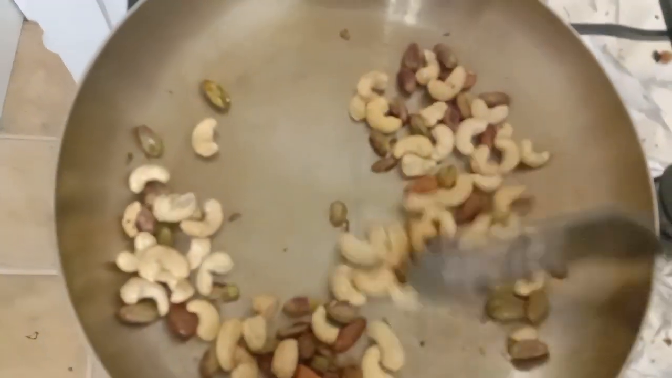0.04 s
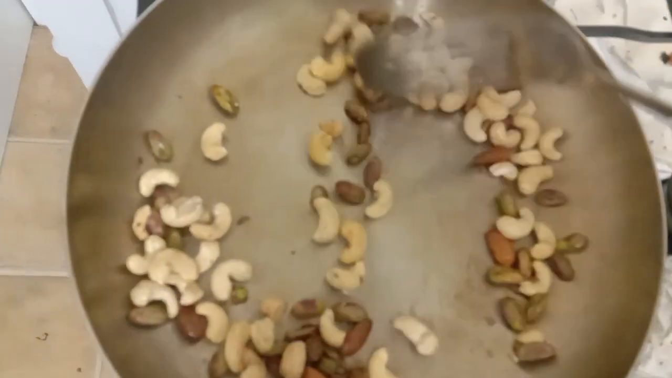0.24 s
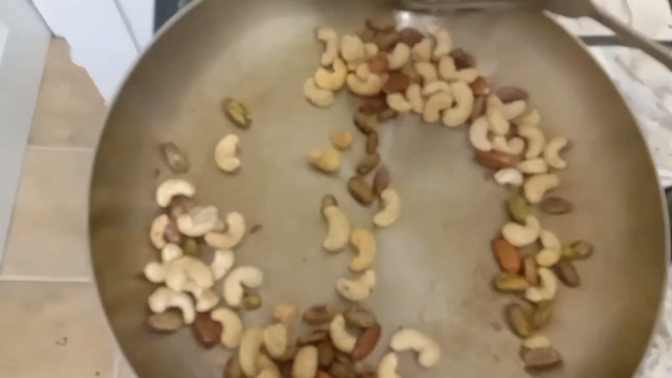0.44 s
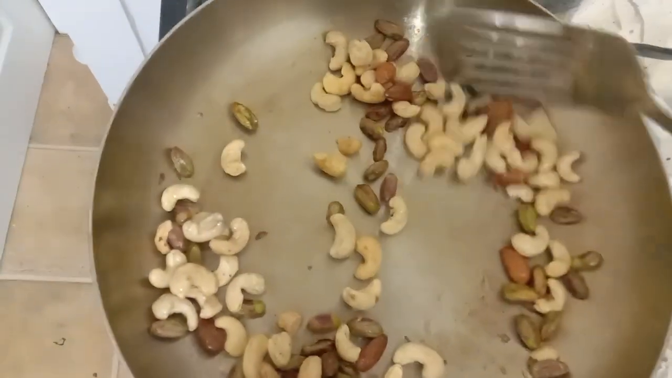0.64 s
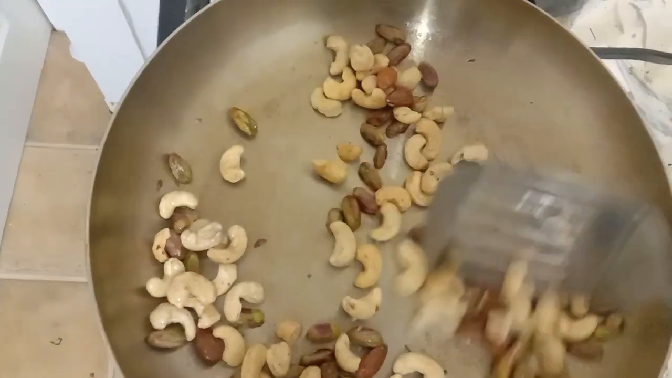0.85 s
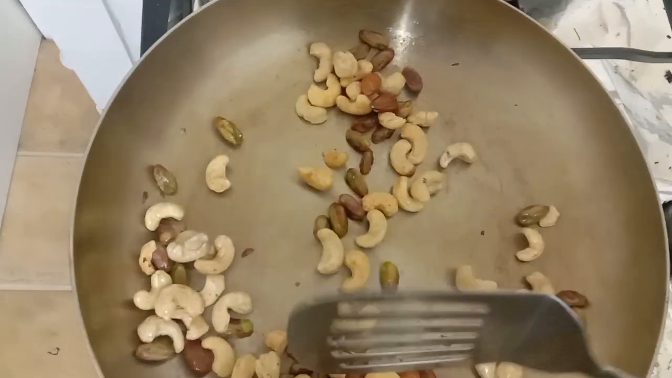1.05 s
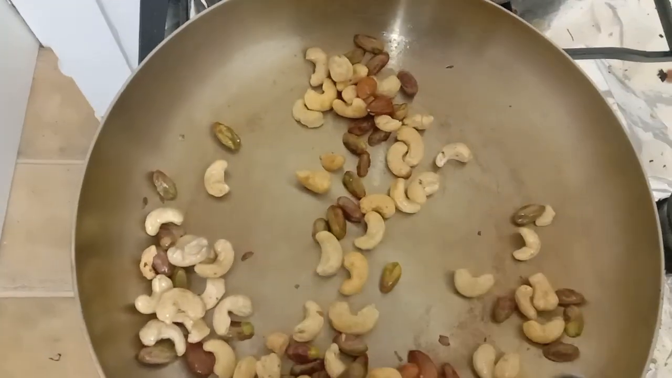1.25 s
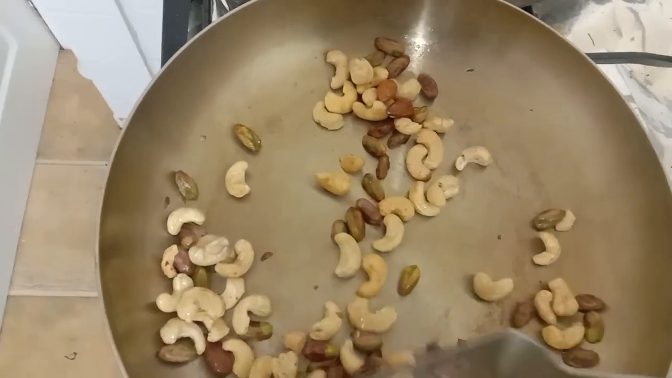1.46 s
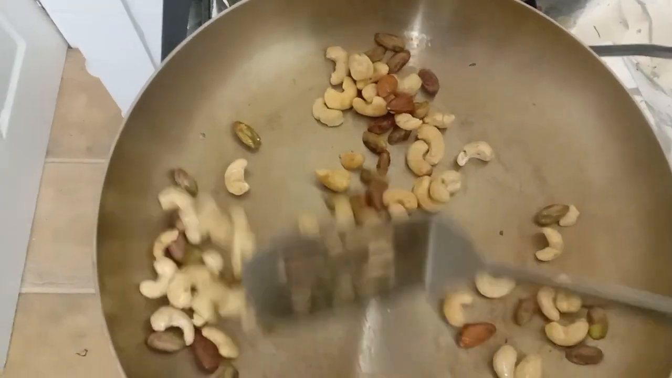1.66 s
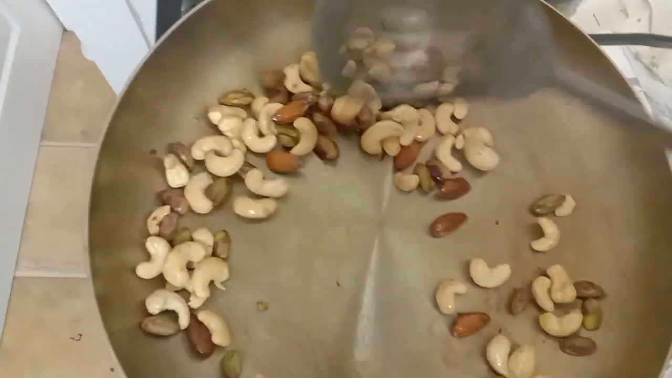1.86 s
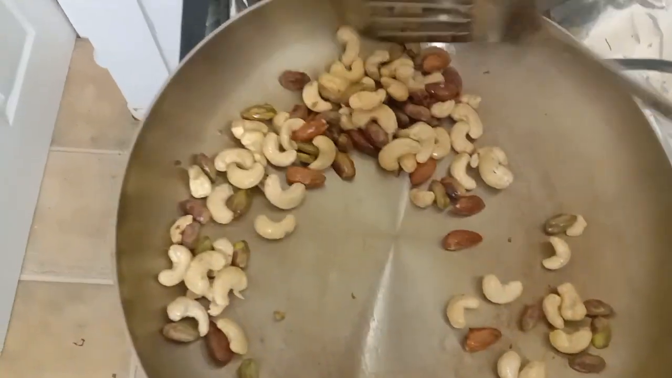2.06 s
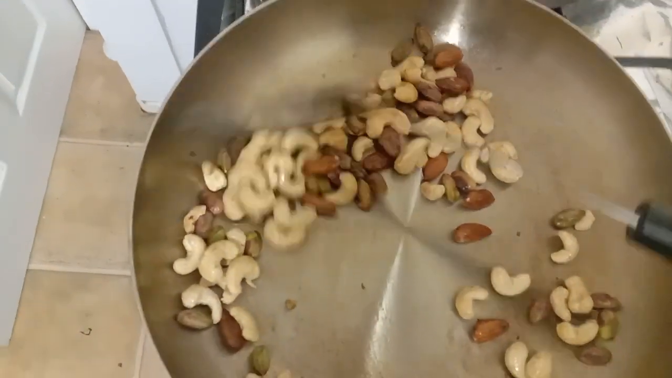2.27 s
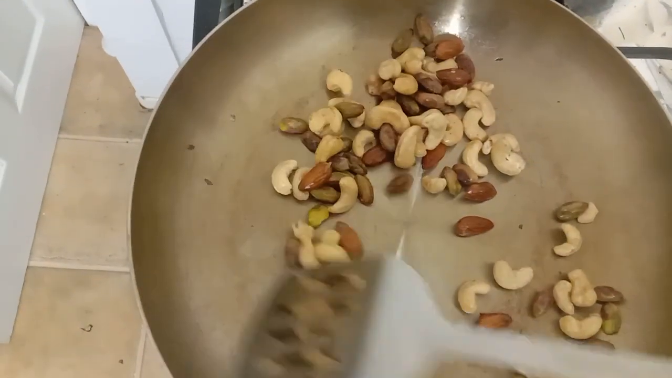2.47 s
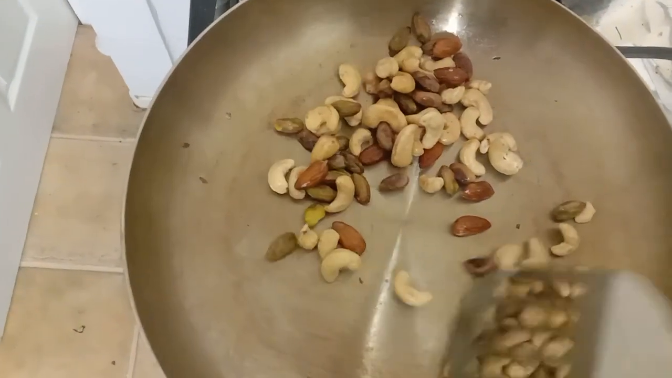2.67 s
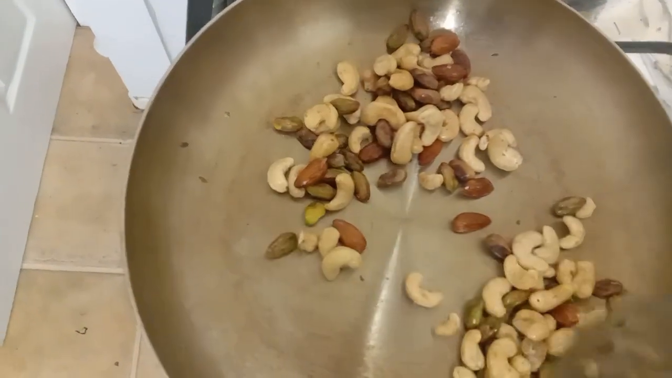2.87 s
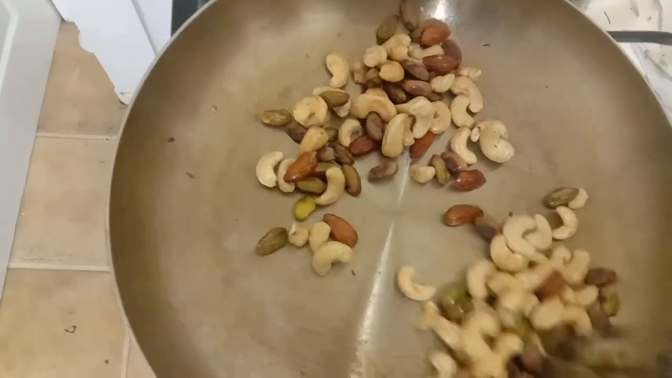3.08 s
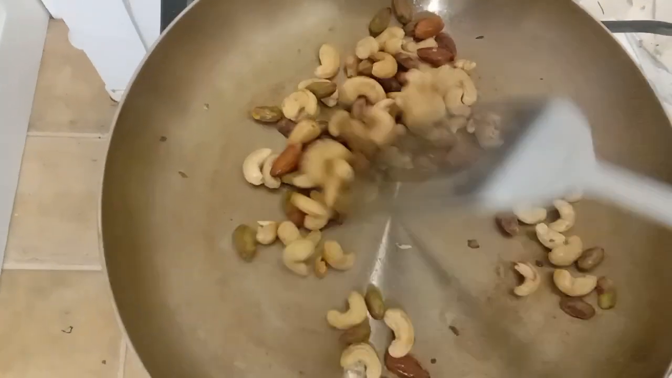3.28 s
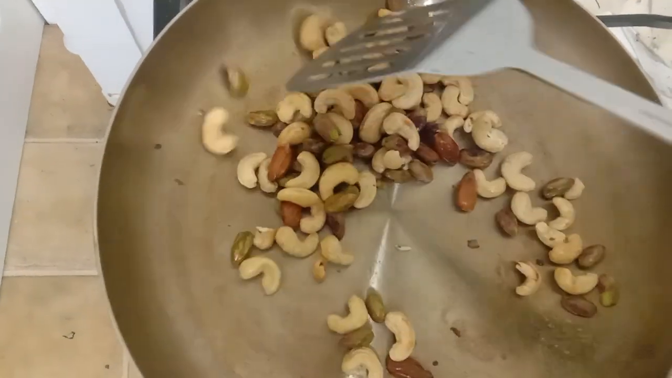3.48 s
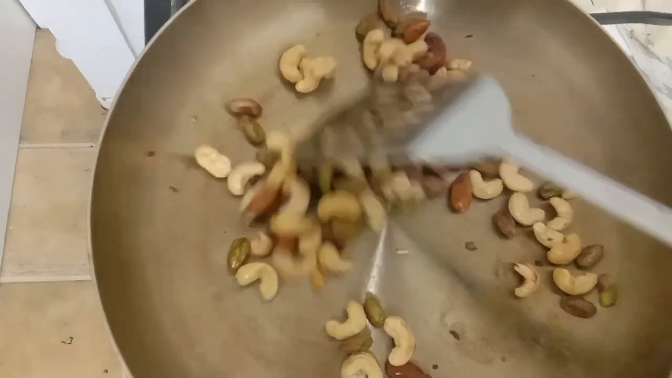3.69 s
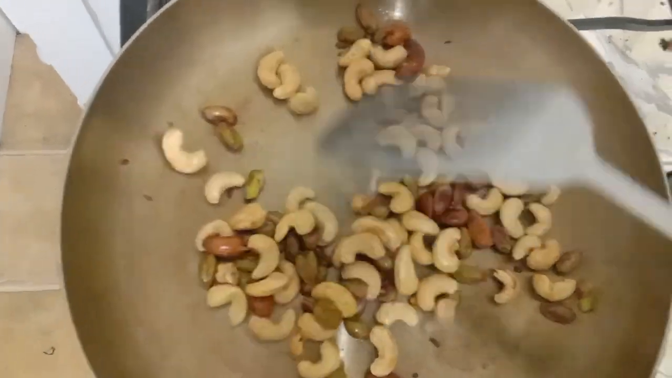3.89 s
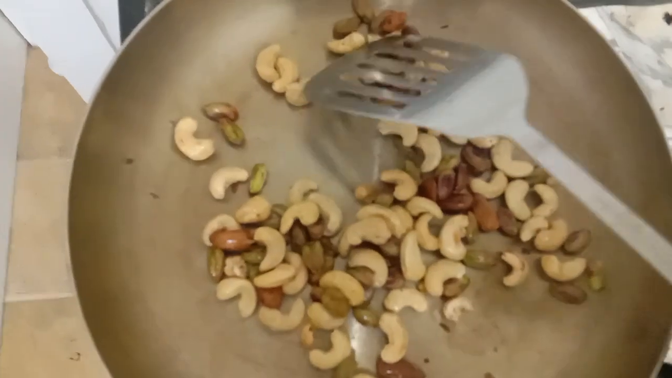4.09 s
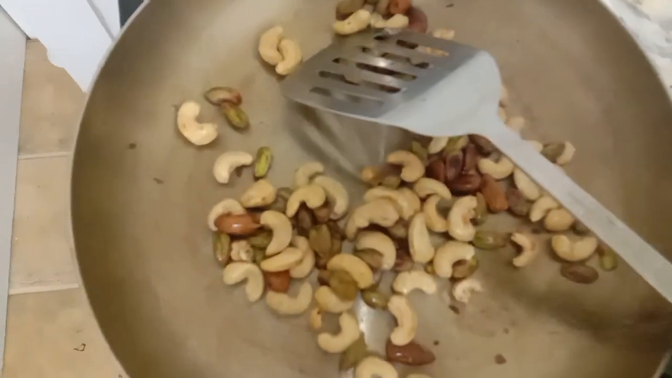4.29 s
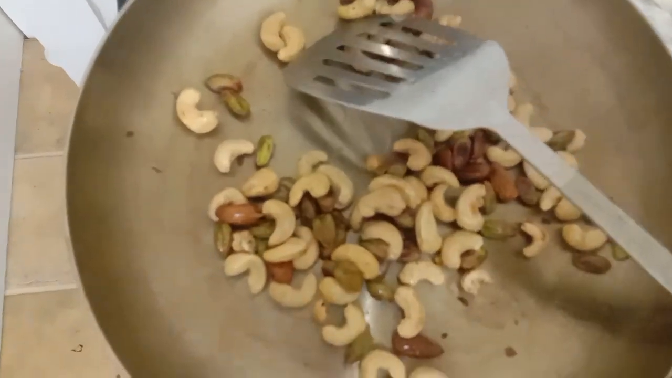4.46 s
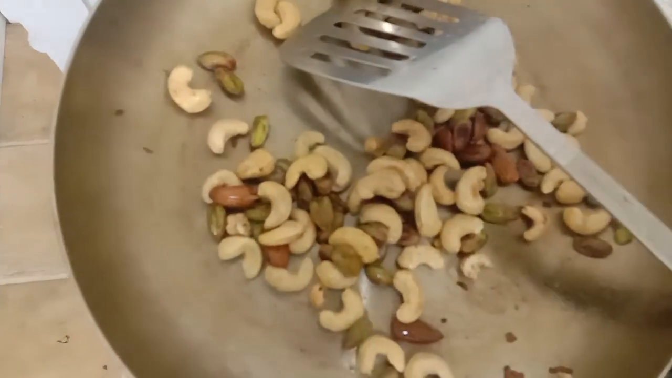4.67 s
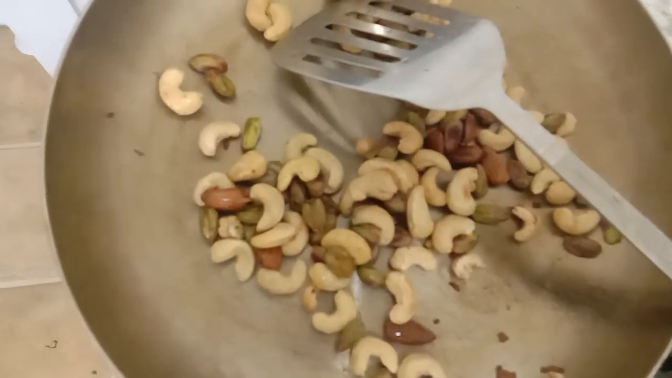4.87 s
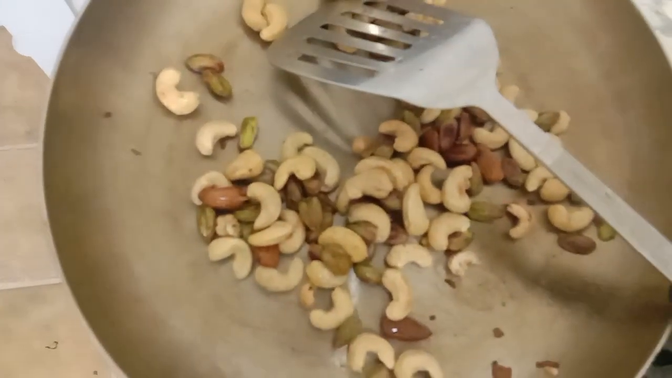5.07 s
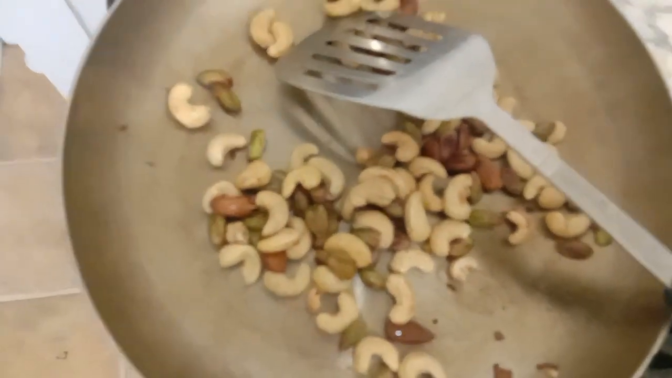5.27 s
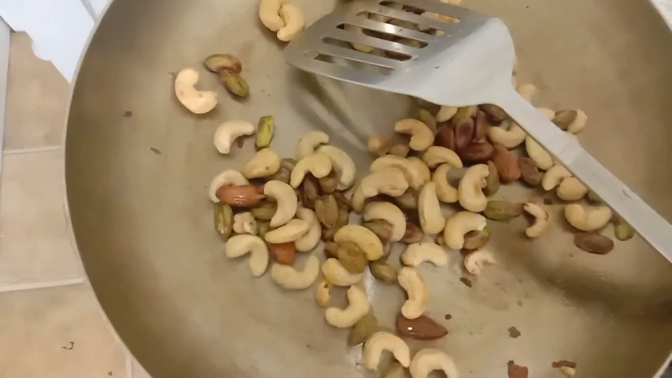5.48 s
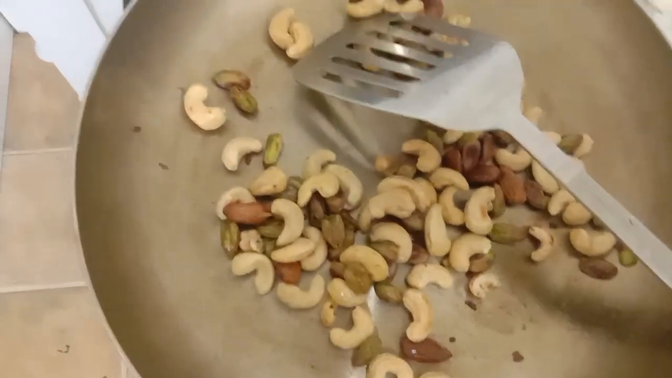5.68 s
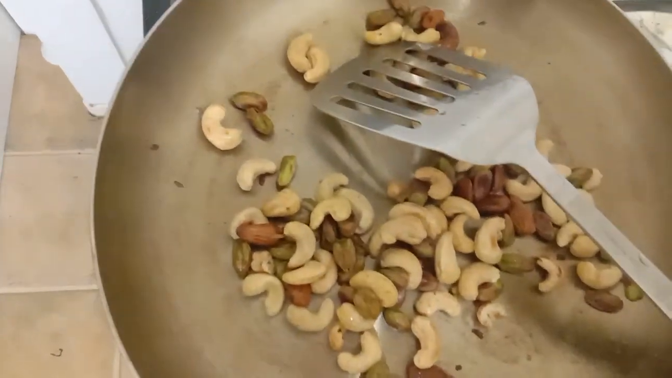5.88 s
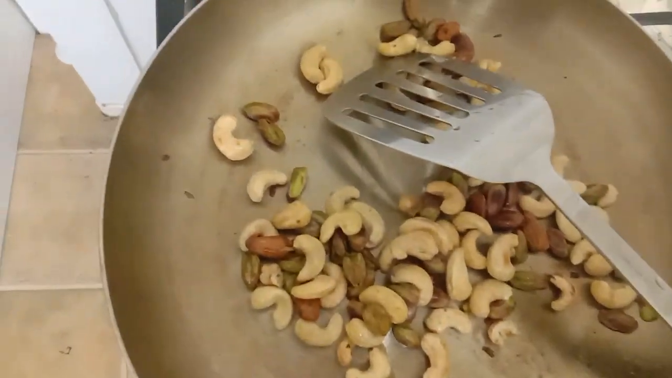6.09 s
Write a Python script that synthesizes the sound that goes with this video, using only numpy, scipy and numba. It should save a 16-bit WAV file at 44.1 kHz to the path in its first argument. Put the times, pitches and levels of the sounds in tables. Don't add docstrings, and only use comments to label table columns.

```python
import sys
import numpy as np
from scipy import signal
from scipy.fft import rfft, irfft, next_fast_len
from scipy.io import wavfile
from scipy.ndimage import uniform_filter1d
from numba import njit

SR = 44100
rng = np.random.default_rng(int(sys.argv[2]) if len(sys.argv) > 2 else 0)


def file_out(sig):
    cols = np.atleast_2d(sig).T
    lim = np.clip(cols, -1, 1)
    pcm = np.round(lim * 32767).astype(np.int16)
    wavfile.write(sys.argv[1], SR, pcm)


def linear_from_db(decibels):
    return 10 ** (np.asarray(decibels, float) / 20)


N = 270774

PAN_HZ = [205, 237, 340, 530, 813, 861, 947, 1197, 1250, 1292, 1540, 1600, 1763, 1873, 2330, 2520, 2595,
          2937, 3020, 3420, 3600, 4223]
PAN_DB = [-13.5, -8.5, -2.5, -3.5, -21, -2.5, -2, -6.5, -3.5, -8, -20.5, -7, -18, -14, -13.5, -5.5, -17,
          -14, -6.5, -1, -4, -8]
BLADE_HZ = [4650, 4760, 4833, 4955, 5245, 5590, 5645, 5750, 5800, 5896, 6435, 6540, 6854, 7050, 7240, 8750,
            9030, 9770, 10650, 11000, 12000, 12900, 14400, 14950, 15200]
BLADE_DB = [-7.5, -5.5, -12.5, -4.5, -5.5, -1.5, -3.5, -10, -5.5, -5.5, -2.5, -6.5, 0.5, -2, -5.5, -6.5,
            -11, 1, -5.5, 2, 4, -6, 2, 2.5, -2.5]
MAIN_HZ = [205, 237, 530, 1197, 1292, 5645, 5750]
# f/Hz, t60/s
DECAY = [(100, 0.42), (500, 0.11), (1500, 0.6), (5000, 0.33), (15000, 0.12)]
ZONES_HZ = [350, 1700, 5700, 11000]
OCTAVES_HZ = 60 * 2 ** np.arange(9)

# t/s, peak level/dB, clink level/dB, edge level/dB, f of the spot struck/Hz
BLOWS = [(0.0, -15, -12.5, -19, 1300), (0.079, -28, -0.5, -39.5, 3000), (0.164, 6, -13.5, -20, 3000),
         (0.604, -9, -6, -2, 6850), (0.799, -16, -18.5, -20.5, 2480), (0.822, -8.5, -13, -51, 2110),
         (1.318, -42, -18, -69, 3820), (1.466, -7.5, -13, -17, 3350), (2.175, -24.5, 2, 6, 1290),
         (2.384, -27, -21, -26, 529), (2.474, -4.5, -13.5, -11.5, 2554), (2.483, -7, -6.5, -10, 1287),
         (2.501, -7, -17, -33.5, 2390), (3.087, -16, -3.5, -4.5, 2600), (3.205, -8, 1, -10, 4600),
         (3.225, -19, -1, -30, 205), (4.51, -25, -29, -51, 330), (6.09, -66.5, -24, 23, 6000),
         (6.099, -68, -6.5, 23, 3000)]
BLOW_THUD_DB, SPOT_DB, SPOT_WIDTH = -27.5, 8, 0.05
BLOW_RING, PRESS_DB_PER_DB = 0.13, 0.78
BLOW_CONTACT_S, NUT_CONTACT_S = 0.0039, 0.0012
# t/s, peak level/dB, clink level/dB, f/Hz
NUTS = [(0.42, -40, -13.5, 980), (0.958, -28, -54, 937), (1.013, -34, -50, 930), (1.55, -21.5, -28, 1200),
        (1.73, -37, -40, 1560), (1.756, -39, -52, 870), (1.845, -26.5, -42, 1117),
        (2.037, -26.5, -77, 1223), (2.682, -30.5, -7, 947), (2.827, -32, -36, 1143), (3.401, -68, -45, 800),
        (3.432, -27, -55, 940), (3.463, -30.5, -6, 923), (3.483, -26.5, -29, 1246),
        (3.575, -26.5, -22, 1546), (3.708, -22, -17, 1318), (3.74, -29.5, -20, 780), (3.773, -27, -63, 865),
        (3.836, -22, -18, 1409), (3.859, -25, -19, 943), (3.892, -18.5, -44, 1080), (4.03, -36, -34.5, 910),
        (4.046, -29.5, -21, 860.5), (5.99, -56, -10.5, 1297)]
NUT_THUD_DB, NUT_RING = -52.5, 0.22
SHELL_HZ, SHELL_DB = 2835, 9.5
KNOCK_DB, KNOCK_S = -16.5, 0.013
# t/s, f/Hz, lift level/dB
PAN_SPOTS = [(0.079, 3010, 4), (0.079, 3540, 4), (0.164, 874, 7), (0.164, 1276, -10), (0.164, 2530, 2.5),
             (0.164, 2950, 6), (0.164, 3350, 2.5), (0.604, 240, 4), (0.604, 1300, 3.5), (0.604, 862, 3),
             (0.604, 3604, -6), (0.604, 3430, 2.5), (0.822, 1626, 6), (0.822, 2030, 0), (0.822, 2420, 4),
             (0.822, 3420, -2), (0.822, 3570, -5), (0.822, 4223, -6), (1.466, 231, 4), (1.466, 1180, -15),
             (1.466, 3356, -5), (1.466, 2000, 3.5), (1.549, 238, 5), (1.845, 558, 7.5), (1.845, 2990, 8.5),
             (2.176, 242, 9.5), (2.176, 526, 6), (2.176, 1300, -4), (2.176, 2080, 3.5), (2.384, 2300, -6),
             (2.474, 1190, -1), (2.474, 1904, 3), (2.474, 2303, 8), (2.474, 2580, 0), (2.474, 3410, 4),
             (2.474, 4250, 1), (3.088, 947, -8), (3.088, 1200, 3), (3.088, 1844, 3.5), (3.088, 2340, 4.5),
             (3.088, 2633, 6.5), (3.088, 3350, 4.5), (3.088, 4240, 9), (3.205, 203, 4), (3.205, 1204, -5),
             (3.205, 1273, -5), (3.205, 947, -5), (3.205, 3453, 6.5), (3.205, 3560, -6), (3.205, 2990, -1),
             (3.575, 2520, 8), (3.707, 2865, 4.5), (3.707, 340.4, 17), (3.836, 2520, 9), (4.511, 947, -12),
             (4.511, 1600, -19)]
# t/s, f/Hz, lift level/dB
BLADE_SPOTS = [(0.0, 5630, 4), (0.0, 5900, 2.5), (0.079, 5800, 3.5), (0.079, 4650, -6), (0.164, 5750, 4),
               (0.164, 5645, -2.5), (0.164, 6535, 3.5), (0.164, 6670, 2), (0.604, 4660, 8),
               (0.604, 5593, 0.5), (0.604, 5645, -9), (0.604, 5850, 3), (0.604, 6800, 3),
               (0.604, 7240, -11), (0.604, 7050, -7.5), (0.604, 8750, 1), (0.604, 9770, -12),
               (0.604, 7860, 6), (0.822, 4870, 6.5), (0.822, 6030, 2), (1.466, 5642, 1), (1.466, 5750, -7),
               (1.466, 4600, -14), (1.466, 6140, 12), (1.466, 6890, 7.5), (1.549, 5783, 5),
               (2.176, 4630, 7), (2.176, 5750, -1.5), (2.176, 6480, 5.5), (2.176, 8760, 5),
               (2.384, 5680, 6), (2.384, 6400, 7.5), (2.384, 8770, 7), (2.384, 9690, 4.5),
               (2.474, 4770, 0.5), (2.474, 5070, 4), (2.474, 5680, 0.5), (2.474, 6450, 4.5),
               (3.088, 4760, 6), (3.088, 5630, 0), (3.088, 6760, -6.5), (3.205, 4810, 3), (3.205, 5645, -7),
               (3.205, 5750, 2.5), (3.205, 5910, 4.5), (3.205, 6574, -1), (3.205, 6880, 1.5),
               (3.463, 5750, 14.5), (4.511, 5870, -1), (4.511, 5640, -8)]

# t/s, length/s, level/dB, change along the stroke/dB, edge level/dB
SCRAPES = [(0.0, 0.077, -21.5, -17, -16), (.084, 0.055, -23, -4, -26.5), (.175, 0.064, -25.5, -3, -17),
           (.612, 0.13, -29.5, -10, -17), (.795, 0.034, -37, 15.5, -26), (1.312, 0.026, -45, -1, -63),
           (1.38, 0.05, -48, -2, -59), (1.475, 0.073, -49, 15.5, -25), (1.57, 0.4, -49.5, -2.5, -30),
           (2.18, 0.083, -35.5, 3.5, -10.5), (2.384, 0.12, -49.5, 20, -5), (2.5, .05, -26, -9, -19),
           (2.585, .035, -39, 0, -12), (3.095, 0.063, -22, -14.5, -14.5), (3.22, 0.067, -23, -15, -21.5),
           (3.46, 0.048, -37, -12, -58), (6.088, 0.093, -57.5, 13, -14)]
# t/s, length/s, level/dB, change along the roll/dB, rumble level/dB
ROLLS = [(0.0, 0.09, -26, -14.5, -3), (.082, 0.034, -30.5, 12.5, -26.5), (.175, 0.12, -24.5, -8.5, -19.5),
         (.36, 0.28, -55, -10, -8), (.612, 0.3, -32.5, -15, -5), (.77, 0.058, -27.5, 3.5, -31),
         (.87, 0.31, -35, -26, -6), (1.3, 0.19, -64.5, 28.5, -8), (1.475, 0.46, -38.5, -9.5, -10),
         (2.04, 0.03, -50, -3, 0), (2.18, 0.27, -43.5, -17, -1), (2.34, 0.093, -46, 6, -7),
         (2.5, 0.11, -26, -10, -6), (2.66, 0.38, -44.5, -22.5, -7.5), (3.095, 0.29, -30, -12, -8),
         (3.22, 0.25, -35.5, -11.5, -5), (3.55, 0.42, -48, -4.5, -5.5), (4.1, 0.5, -55, -13, -8)]
# t/s, length/s, level/dB, change/dB, rumble/dB
HANDLING = [
    (4.76, 0.51, -72.5, 7, -7.5),
    (5.3, 0.11, -60, -5, -12),
    (5.825, 0.028, -90, -11, 22),
    (5.951, 0.072, -78, 25, 4),
    (6.05, .09, -70, -11, 20),
]
ATTACK_DB_S, SCRAPE_RELEASE_DB_S, ROLL_RELEASE_DB_S = 2500, 448.5, 254
SCRAPE_LOW_DB = [-31.5, -10.5]
ROLL_HIGH_DB = [-15.5, -38.5]
SIZZLE_DB = [-25.5, -13.5, -6, -13.5]
LINE_DB, PATCHY_DB = 0.5, 2.5

# t/s, level/dB
FLAME = [
    (0, -61.5),
    (4.4, -61),
    (5.38, -66.5),
    (5.46, -78),
    (6.2, -109),
]
# f/Hz, width/Hz, level/dB
BURNER = [(863, 38, 0.5), (1228, 38, 4), (1490, 60, 0), (3100, 34, -8.5), (3410, 140, -3.5), (4600, 19, -6),
          (5170, 71, -1), (5570, 80, -8), (6750, 550, -34)]
# f/Hz, level/dB
GAS_HISS = [(6000, -18.5), (8500, -10.5), (12500, -6.5), (14000, -5), (15100, 3), (15700, -20)]
GAS_HISS_DB = -15
# t/s, level/dB
STOVE = [(0.0, -59), (0.56, -79.5), (0.89, -54), (1.28, -81), (1.4, -58.5), (1.78, -81), (1.83, -60),
         (1.98, -90), (2.5, -64), (2.92, -65.5), (3.01, -88.5), (3.09, -64.5), (4.1, -83.5), (4.48, -74),
         (4.51, -56.5), (4.82, -81.5), (5.71, -97), (6.14, -75.5)]
# f/Hz, level per Hz/dB
ROOM = [(18, -51.5), (30, -9.5), (139, 2), (792, 5.5), (1120, -7.5), (1240, 8), (2050, -5), (7090, 2.5),
        (7880, -13), (11100, -2.5), (12700, -15.5), (14800, -2.5), (16500, -20.5)]
ROOM_DB = -75.5

# t/s, peak level/dB, f/Hz, decay/s
CHIMES = [
    (0.164, -9, 3000, .005),
    (0.605, -10, 5680, .01),
    (2.477, -13, 1293, .012),
    (2.4904, -10.5, 1236, .007),
    (2.501, -13.5, 1200, .009),
    (2.176, -25, 4630, .015),
    (3.088, -23, 2620, .03),
    (3.089, -27, 3330, .02),
    (3.708, -37, 2810, .008),
    (3.836, -37, 2910, .006),
]
# t/s, length/s, level/dB, f/Hz, width/Hz
PUFF = (1.311, .036, -45, 3700, 3000)
# t/s, length/s, level/dB, change/dB, f/Hz
SINGS = [(.18, 0.092, -34.5, -1.5, 5790), (0.625, 0.096, -39, -8, 4650), (0.615, .13, -33, -11.5, 5740),
         (0.618, 0.094, -48, 3, 237), (1.537, 0.055, -36, -6.5, 1200), (1.615, 0.025, -42.5, -4, 5760),
         (1.501, 0.41, -55.5, -5, 236), (1.86, 0.12, -53, -14, 533), (2.18, .08, -46, -4, 530),
         (2.24, .055, -40, 0, 1300), (2.188, 0.054, -38, -2, 5680), (2.178, .05, -36, -8.5, 4650),
         (2.518, 0.14, -41, -16, 4230), (3.1, 0.66, -48, -17, 205), (3.694, 0.18, -50.5, -11, 313),
         (4.599, 0.13, -49, -12.5, 311), (4.759, .02, -56, 0, 1277), (5.824, 0.13, -72, -9, 258),
         (6.018, 0.061, -58, -10, 780), (6.093, 0.053, -64, 0, 5900)]
SING_WIDTH_HZ, SING_WIDTH_SHARE = 39, 0.0065
# t/s, peak level/dB
TICKS = [(0.503, -57.5), (0.5458, -52), (0.7461, -42), (0.9547, -57), (1.1963, -47), (1.3389, -49),
         (1.5432, -49), (1.7943, -46), (1.8104, -48), (1.8253, -53), (1.865, -46), (1.9924, -49.5),
         (2.071, -51), (2.107, -51), (2.2952, -50), (2.3124, -55), (2.7794, -55), (3.4625, -48),
         (3.623, -46), (3.7154, -53), (3.919, -51), (4.0637, -53), (4.2956, -57), (4.3685, -50),
         (4.5484, -54), (5.9365, -53), (6.007, -51), (6.0167, -57), (6.0332, -50), (6.0586, -54)]
# t/s, peak level/dB, f/Hz
TAPS = [(0.746, -26, 5600), (0.822, -8, 2100), (1.844, -35, 1570), (2.039, -30, 1180), (2.177, -18, 5600),
        (2.385, -35, 1000), (2.683, -37, 950), (3.116, -18, 5630), (3.21, -13, 5750), (3.223, -5, 5740),
        (3.229, -13, 3416), (3.432, -36, 940), (3.485, -26, 1250), (3.575, -35, 1610), (3.709, -31.5, 1250),
        (3.773, -40, 785), (3.836, -32, 1190), (3.892, -28, 1180), (4.046, -41, 840), (4.513, -24.5, 1220),
        (4.519, -27, 942), (4.53, -24, 1180), (4.544, -26, 1300)]
TAP_DB, TAP_TAIL_DB, TAP_TAIL_S = -1, -11, 0.0054

# t/s, level/dB
SLIDE = [
    (4.1, -67),
    (4.212, -61),
    (4.27, -62.5),
    (4.357, -56.5),
    (4.435, -60),
    (4.5, -74),
]
# f/Hz, width/Hz, level/dB
SLIDE_BANDS = [(2340, 150, -4), (3610, 49, -3), (3940, 140, -2.5)]
# t/s, peak level/dB
REST = [
    (4.514, -23),
]
# f/Hz, level/dB, t60/s
REST_MODES = [(298, -20, 0.85), (341, -4, 0.3), (505, -16, 0.4), (528, -37, 0.091), (947, 5, 0.083),
              (980, -33.5, 0.42), (1200, 1.5, 0.2), (1300, 3, 0.24), (1470, -12, 0.18), (1882, -6, 0.41),
              (2283, -30, 0.4), (2520, -64, 0.21), (3000, -10, 0.67), (3580, -8.5, 0.39)]
# t/s, length/s, level/dB, change/dB
DRAGS = [
    (5.3, 0.07, -52.5, -5),
    (5.985, 0.027, -71, 20),
]
# f/Hz, width/Hz, level/dB, lag/s
DRAG_BANDS = [(1254, 69, -3, 0), (718, 190, -10, .035), (271, 150, -12.5, 0.038)]

# f/Hz, level/dB
MIC = [(20, -32), (80, -9), (200, -2), (800, -4), (2000, -6.5), (4000, -7), (5800, -1.5), (7300, -3.5),
       (8000, -12.5), (10500, -11),
       (13500, -18), (15000, -11), (15550, -12), (15800, -36)]


def unit(x):
    return x / np.sqrt(np.mean(x ** 2))


def curve(s, value):
    return np.interp(np.arange(N) / SR, s, value)


def colour(x, points):
    hz, db = np.transpose(points)
    size = next_fast_len(N)
    gain_db = np.interp(np.log(np.fft.rfftfreq(size, 1 / SR) + 1), np.log(hz), db)
    return irfft(rfft(x, size) * linear_from_db(gain_db), size)[:N]


def band(x, hz, width):
    edges = np.clip([hz - width / 2, hz + width / 2], 10, SR / 2 - 500)
    return signal.sosfilt(signal.butter(2, edges, "band", fs=SR, output="sos"), x)


@njit
def ring(x, hz, loss):
    y, z, turn = np.empty(len(x)), 0j, np.exp(2j * np.pi * hz / SR)
    for i in range(len(x)):
        z = z * turn * (1 - loss[i]) + x[i] + 1e-18
        y[i] = z.real
    return y


def grit(rate, scatter_db):
    slips = rng.random(N) < rate / SR
    strength = linear_from_db(scatter_db * rng.exponential(size=N).clip(0, 5))
    return unit(slips * rng.standard_normal(N) * strength)


def zoned(hz, zone_db):
    return np.interp(np.log(hz), np.log(ZONES_HZ), zone_db)


def stroke_db(s, length, db, change_db, release_db_s):
    t = np.arange(0, N, 32) / SR - s
    steady = db + change_db * np.clip(t / length, 0, 1)
    return steady + ATTACK_DB_S * np.minimum(t, 0) - release_db_s * np.maximum(t - length, 0)


def bursts(s, contact_s):
    out, t = np.zeros(N + 1000), np.arange(1000) / SR
    for start, length, noise in zip(s, contact_s, rng.standard_normal((len(s), len(t)))):
        force = noise * np.exp(-t / length)
        out[int(start * SR):][:len(t)] += force / np.sqrt(np.sum(force ** 2))
    return out[:N]


def blow_levels(hz, db):
    levels = []
    for _, peak, clink, edge, pitch in BLOWS:
        spot = SPOT_DB * np.exp(-(np.log(hz / pitch) / SPOT_WIDTH) ** 2)
        levels.append(peak + zoned(hz, [BLOW_THUD_DB, -8, clink, edge]) + db + spot)
    return levels


def nut_levels(hz, db):
    shell = SHELL_DB * np.exp(-(np.log(hz / SHELL_HZ) / 0.19) ** 2)
    levels = []
    for _, peak, clink, pitch in NUTS:
        spot = 18 * np.exp(-(np.log(hz / pitch) / 0.046) ** 2)
        zones = zoned(hz, [NUT_THUD_DB - peak, -12, clink - 12, clink - 32])
        levels.append(peak + zones + db + spot + shell * (clink > -25))
    return levels


def motion_power(rows, release_db_s, zones):
    power = 0
    for *stroke, zone_setting in rows:
        tilt_db = zoned(OCTAVES_HZ, zones(zone_setting))[:, None]
        power = power + linear_from_db(2 * (stroke_db(*stroke, release_db_s) + tilt_db))
    return power


def rubbing():
    def scrape_zones(edge_db):
        return [*SCRAPE_LOW_DB, 0, edge_db]

    def roll_zones(rumble_db):
        return [rumble_db, 0, *ROLL_HIGH_DB]

    blade = motion_power(SCRAPES, SCRAPE_RELEASE_DB_S, scrape_zones)
    blade = blade + motion_power(HANDLING, ROLL_RELEASE_DB_S, roll_zones)
    nuts = motion_power(ROLLS, ROLL_RELEASE_DB_S, roll_zones)
    t = np.arange(blade.shape[1]) * 32 / SR
    blade = blade + linear_from_db(2 * (np.interp(t, *np.transpose(FLAME)) + zoned(OCTAVES_HZ, SIZZLE_DB)[:, None]))
    waver = uniform_filter1d(rng.standard_normal(blade.shape), size=30, axis=1)
    patchy = linear_from_db(2 * PATCHY_DB * waver / waver.std())
    fine, coarse = grit(5000, 2.3), grit(2600, 1.9)
    slip = []
    for hz, blade_power, nut_power in zip(OCTAVES_HZ, blade * patchy, nuts * patchy):
        force = fine * np.sqrt(curve(t, blade_power)) + coarse * np.sqrt(curve(t, nut_power))
        slip.append(band(force, hz, 0.59 * hz))
    return np.array(slip)


@njit
def modes(hz, loss, octave, latest, burst, hit, slip, rub):
    y = np.zeros(len(latest))
    for k in range(len(octave)):
        z, pole = 0j, np.exp(2j * np.pi * hz[:, k] / SR - loss[:, k])
        for i in range(len(y)):
            j = latest[i]
            z = z * pole[j] + burst[octave[k], i] * hit[j, k] + slip[octave[k], i] * rub[j, k] + 1e-18
            y[i] += z.real
    return y


def steel():
    small_hz = 90 + 16000 * np.sort(rng.random(size=220)) ** 1.5
    hz = np.r_[PAN_HZ, BLADE_HZ, small_hz]
    strong = np.arange(len(hz)) < len(PAN_HZ) + len(BLADE_HZ)
    main = np.isin(hz, MAIN_HZ)
    db = np.r_[PAN_DB, BLADE_DB, np.interp(small_hz, [300, 900], [-19, -14])] + 5 * main
    decay_hz, decay_s = np.transpose(DECAY)
    t60 = np.interp(np.log(hz), np.log(decay_hz), decay_s)
    t60 = t60 * np.where(strong, 1.1, 0.8) * np.where(main, 1.7, 1)

    starts = np.array([row[0] for row in BLOWS] + [row[0] for row in NUTS])
    order = np.argsort(starts)
    s = starts[order]
    blow_free = [BLOW_RING * linear_from_db(-PRESS_DB_PER_DB * max(row[1], -30)) for row in BLOWS]
    free = np.array(blow_free + [NUT_RING] * len(NUTS))[order]
    contact_s = np.array([BLOW_CONTACT_S] * len(BLOWS) + [NUT_CONTACT_S] * len(NUTS))[order]
    latest = np.clip(np.searchsorted(s * SR, np.arange(N), "right") - 1, 0, None)

    shape = (len(s), len(hz))
    spot_db = np.where(strong, 2.5, 4.0) * rng.standard_normal(shape).clip(-3, 1.5)
    tuned_hz = hz * (1 + 0.004 * rng.standard_normal(shape))
    for spots in (PAN_SPOTS, BLADE_SPOTS):
        for start, spot_hz, lift_db in spots:
            stroke = (s > start - 0.004) & (s < start + 0.035)
            k = np.abs(hz - spot_hz).argmin()
            spot_db[stroke, k] = lift_db + 9 * (not strong[k])
            tuned_hz[stroke, k] = spot_hz

    hit = linear_from_db(np.array(blow_levels(hz, db) + nut_levels(hz, db))[order] + spot_db - 4.5)
    loss = np.log(1000) / SR / t60 / np.clip(free, 0.08, 0.36)[:, None]
    rub = linear_from_db(db + spot_db - 3.5 + LINE_DB * strong) * np.sqrt(loss)
    force = bursts(s, contact_s)
    burst = np.array([band(force, f, 1.6 * f) for f in OCTAVES_HZ])
    octave = np.abs(np.log(hz[:, None] / OCTAVES_HZ)).argmin(axis=1)
    ringing = modes(tuned_hz, loss, octave, latest, burst, hit, rubbing(), rub)
    return colour(ringing, MIC)


def burner():
    gas = rng.standard_normal(N)
    hiss = 0
    for hz, width, db in BURNER:
        flicker_db = 2.5 * unit(band(rng.standard_normal(N), 14, 12))
        hiss = hiss + linear_from_db(db + flicker_db) * band(gas, hz, 3 * width)
    roar = linear_from_db(-24) * unit(band(rng.standard_normal(N), 90, 70))
    return (unit(hiss) + roar) * linear_from_db(curve(*np.transpose(FLAME)))


def gas_hiss():
    hiss = unit(colour(rng.standard_normal(N), [(3000, -57.5), *GAS_HISS]))
    return hiss * linear_from_db(GAS_HISS_DB + curve(*np.transpose(FLAME)))


def stove():
    sway = unit(band(rng.standard_normal(N), 14, 8))
    rumble = unit(band(band(rng.standard_normal(N), 105, 98), 105, 98))
    return rumble * linear_from_db(curve(*np.transpose(STOVE)) - 1.5 + 3 * sway)


def hush():
    return linear_from_db(ROOM_DB) * unit(colour(rng.standard_normal(N), ROOM))


def echo(metal):
    t = np.arange(int(SR / 2)) / SR
    walls = rng.standard_normal(len(t)) * linear_from_db(-60 * t / 0.33) * (t > 0.006)
    return linear_from_db(-13) * signal.fftconvolve(metal, walls / np.sqrt(np.sum(walls ** 2)))[:N]


def chimes():
    t = np.arange(N) / SR
    out = 0
    for s, db, hz, decay in CHIMES:
        after = np.clip(t - s, 0, None)
        envelope = np.exp(-after / decay) * np.minimum(after / 0.0012, 1)
        out = out + linear_from_db(db) * np.sin(2 * np.pi * hz * after) * envelope
    s, length, db, hz, width = PUFF
    part = np.clip((t - s) / length, 0, 1)
    brush = unit(band(band(rng.standard_normal(N), hz, width), hz, width))
    return out + linear_from_db(db) * np.sin(np.pi * np.sqrt(part)) ** 2 * brush


def sings():
    out, t = np.zeros(N + SR), np.arange(SR) / SR
    for (s, length, db, change_db, hz), noise in zip(SINGS, rng.standard_normal((len(SINGS), SR))):
        end_db = db + change_db
        level_db = np.interp(t, [0, 0.012, length, length + 0.1], [db - 30, db, end_db, end_db - 60])
        tone = unit(band(noise, hz, SING_WIDTH_HZ + SING_WIDTH_SHARE * hz))
        out[int(s * SR):][:SR] += tone * linear_from_db(level_db) * (t < length + 0.1)
    return out[:N]


def knocks():
    out, t = np.zeros(N + 3000), np.arange(3000) / SR
    for (s, db, _, hz), noise in zip(NUTS, rng.standard_normal((len(NUTS), len(t)))):
        body = unit(band(band(noise, 1.177 * hz, hz), 1.3 * hz, 1.2 * hz))
        out[int(s * SR):][:len(t)] += linear_from_db(db + KNOCK_DB) * body * np.exp(-t / KNOCK_S)
    return out[:N]


def oil():
    s, db = np.transpose(TICKS)
    kick = np.zeros(N)
    kick[(s * SR).astype(int)] = linear_from_db(db - 4)
    return ring(kick, 0.0, np.full(N, 0.03)) * unit(band(rng.standard_normal(N), 10000, 10500))


def taps():
    out, t = np.zeros(N + 3000), np.arange(3000) / SR
    impulse = 1.0 * (t == 0)
    for (s, db, hz), noise in zip(TAPS, rng.standard_normal((len(TAPS), len(t)))):
        click = band(band(impulse, hz, 0.95 * hz), hz, 0.95 * hz)
        click = click / np.abs(click).max()
        rattle = unit(band(noise, hz, 0.29 * hz)) * np.exp(-t / TAP_TAIL_S)
        out[int(s * SR):][:len(t)] += linear_from_db(db + TAP_DB) * (click + linear_from_db(TAP_TAIL_DB) * rattle)
    return out[:N]


def rest():
    s, db = np.transpose(SLIDE)
    t = np.arange(N) / SR
    slip = grit(6000, 1.6) * linear_from_db(np.interp(t, s, db, left=-200, right=-200))
    out = sum(linear_from_db(gain_db + 17) * band(slip, hz, 2.9 * width) for hz, width, gain_db in SLIDE_BANDS)
    start, peak_db = REST[0]
    knock = band(bursts([start], [0.004]), 1500, 2800)
    after = np.clip(t - start, 0, None)
    chatter = (after > 0) * np.exp(-after / 0.064) * rng.standard_normal(N)
    knock = (knock + linear_from_db(-38) * band(chatter, 1100, 2200)) * linear_from_db(peak_db - 10)
    out = out + linear_from_db(peak_db - 2) * band(chatter, 510, 700)
    for hz, mode_db, t60 in REST_MODES:
        damped_s = min(t60, 0.6 if hz < 400 else 0.2)
        out = out + linear_from_db(mode_db) * ring(knock, 1.0 * hz, np.full(N, np.log(1000) / SR / damped_s))
    return out


def drags():
    t = np.arange(0, N, 32) / SR
    push = grit(3000, 1.9) * curve(t, sum(linear_from_db(stroke_db(*row, 250)) for row in DRAGS))
    out = 0
    for hz, width, db, lag in DRAG_BANDS:
        delayed = np.roll(push, int(lag * SR))
        out = out + linear_from_db(db) * band(delayed, hz, width) * np.sqrt(SR / 2 / width)
    return out


def scene():
    metal = steel() + chimes() + sings() + knocks() + taps() + rest()
    rest_of_kitchen = burner() + gas_hiss() + stove() + oil() + drags()
    return (metal + echo(metal) + rest_of_kitchen + hush())[None]


def roll_off(x):
    return signal.sosfilt(signal.butter(12, 16820, fs=SR, output="sos"), x)


def record(dry):
    ceiling = 0.92
    softened = ceiling * np.tanh(dry[0] / ceiling)
    mix = colour(softened, [(25, -10), (90, -1), (16000, -1), (16750, -12.5), (17000, -65.5)])
    return roll_off(mix[None])


dry = scene()
out = record(dry)
file_out(out)
```